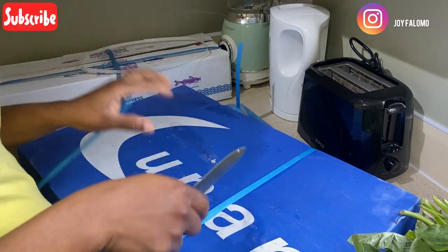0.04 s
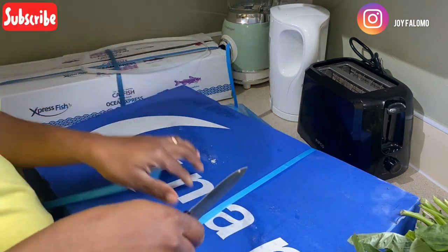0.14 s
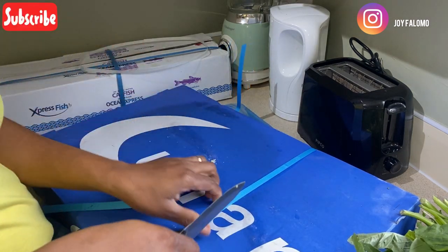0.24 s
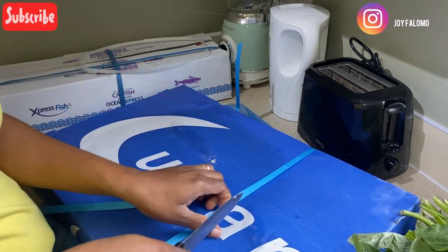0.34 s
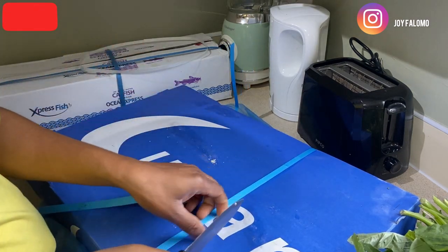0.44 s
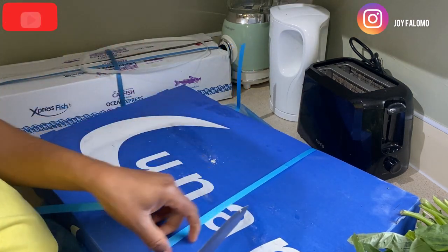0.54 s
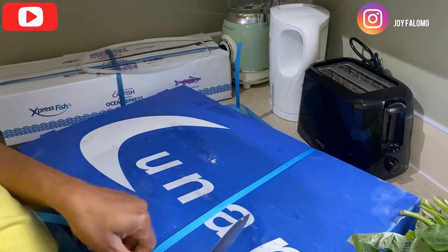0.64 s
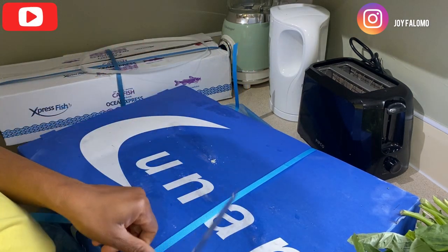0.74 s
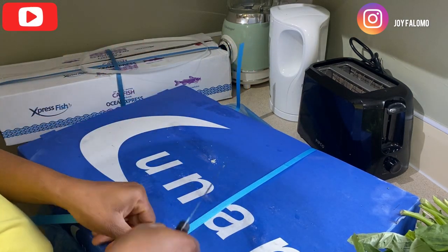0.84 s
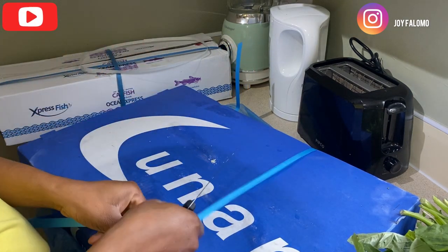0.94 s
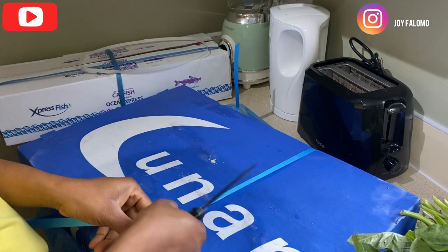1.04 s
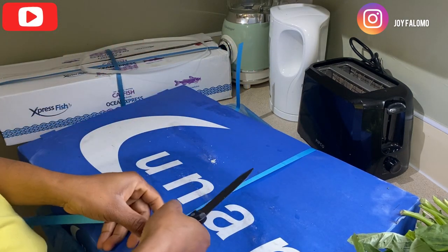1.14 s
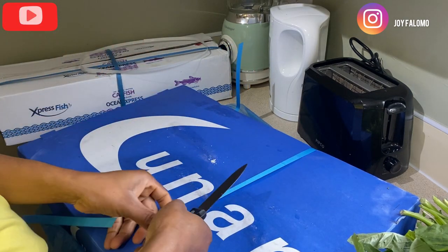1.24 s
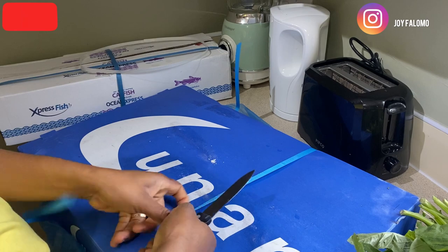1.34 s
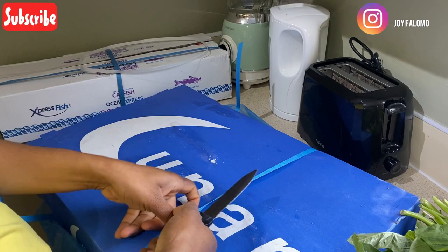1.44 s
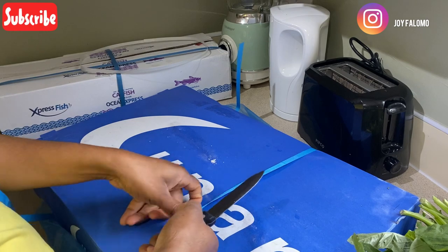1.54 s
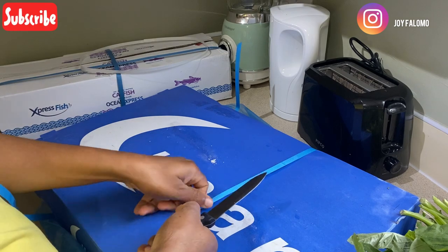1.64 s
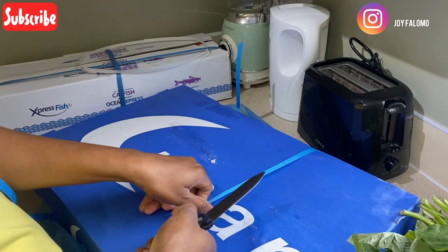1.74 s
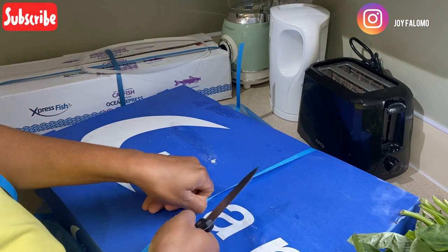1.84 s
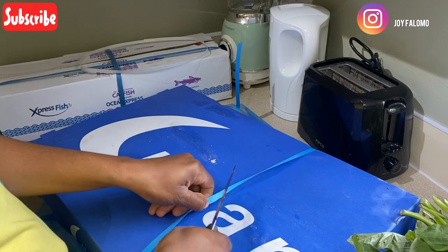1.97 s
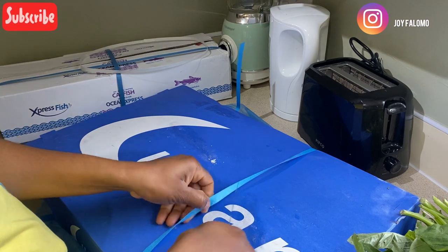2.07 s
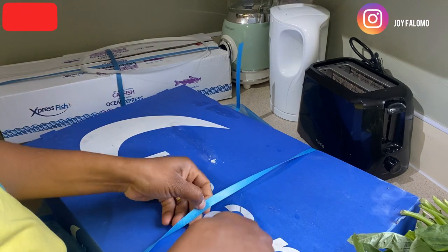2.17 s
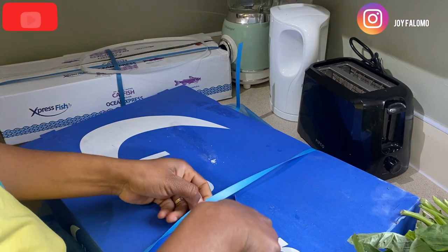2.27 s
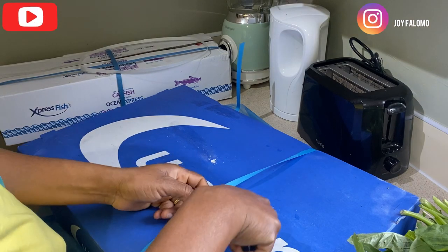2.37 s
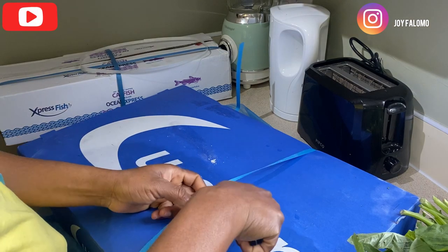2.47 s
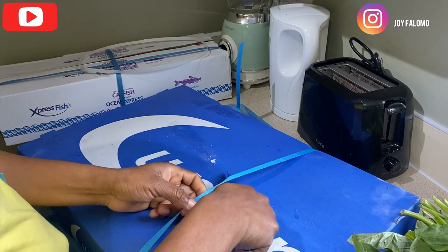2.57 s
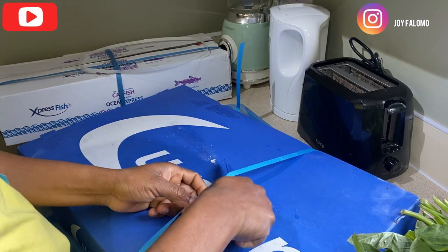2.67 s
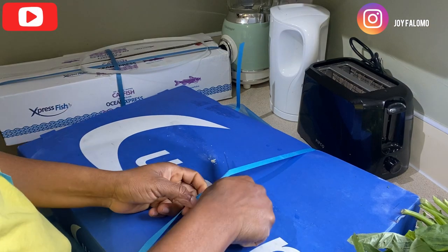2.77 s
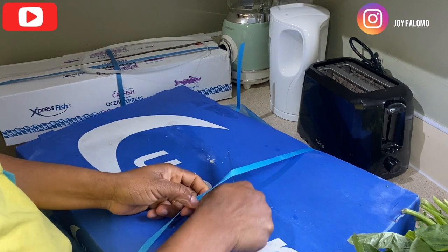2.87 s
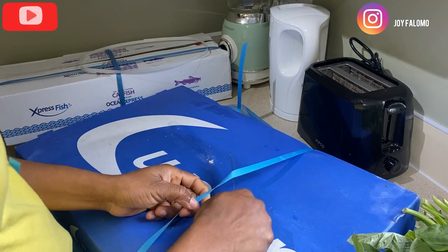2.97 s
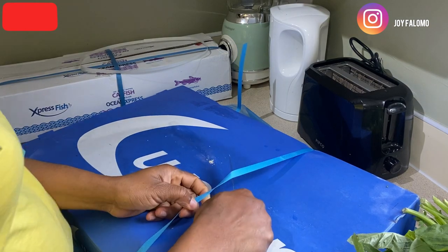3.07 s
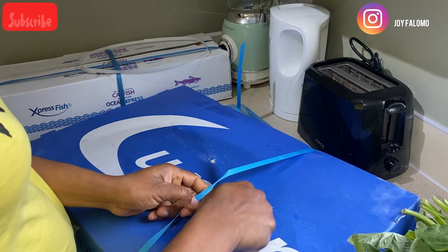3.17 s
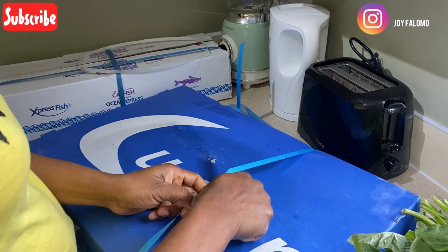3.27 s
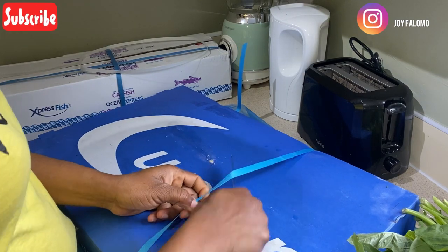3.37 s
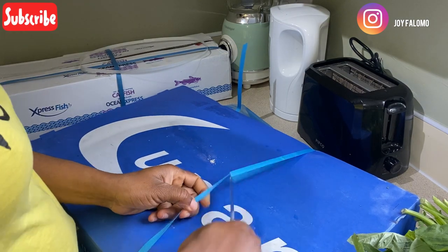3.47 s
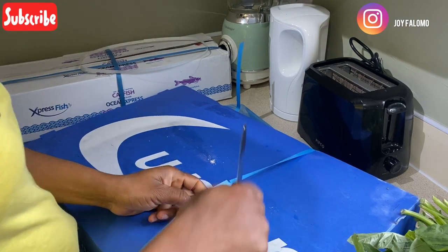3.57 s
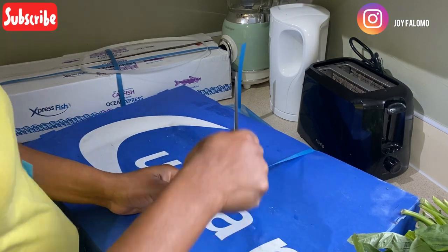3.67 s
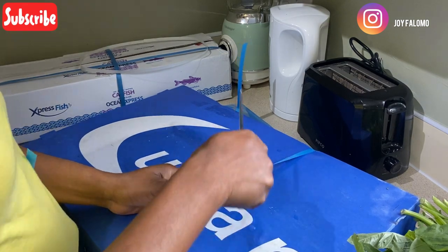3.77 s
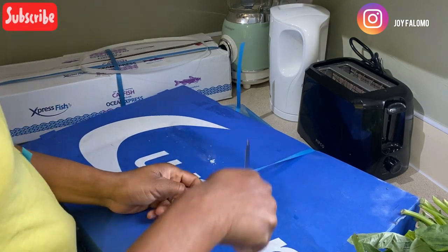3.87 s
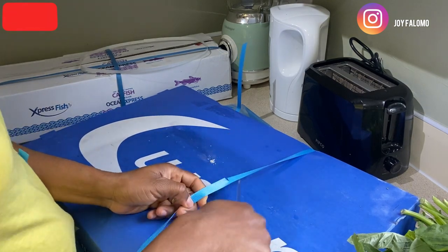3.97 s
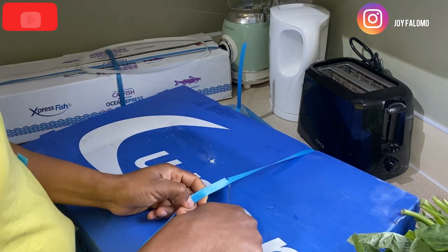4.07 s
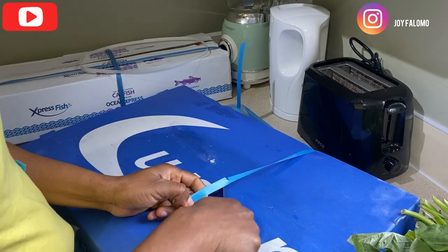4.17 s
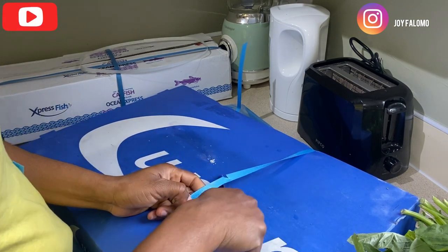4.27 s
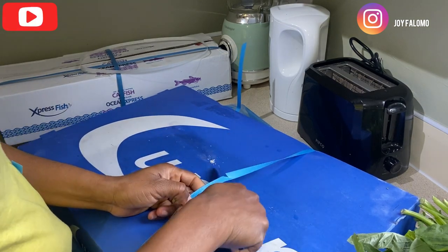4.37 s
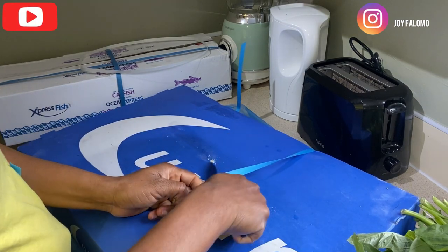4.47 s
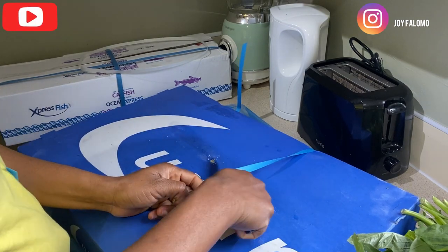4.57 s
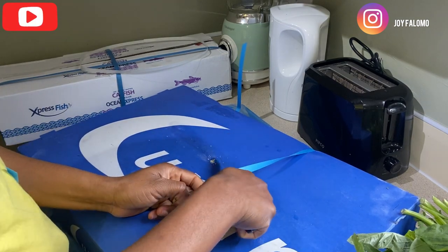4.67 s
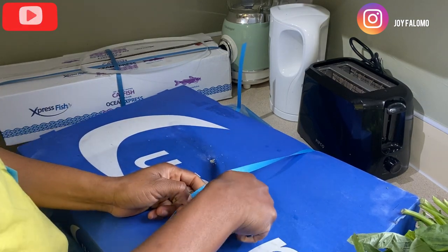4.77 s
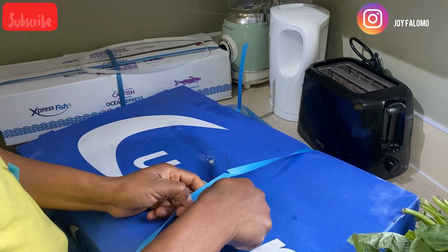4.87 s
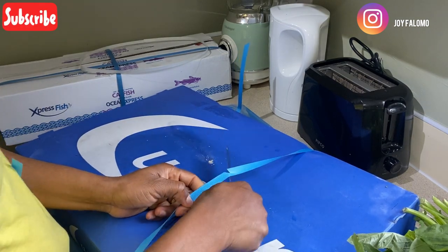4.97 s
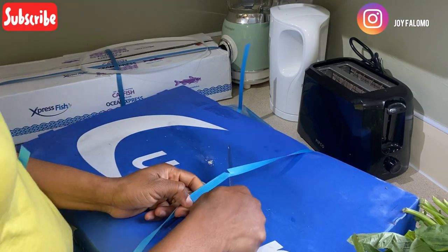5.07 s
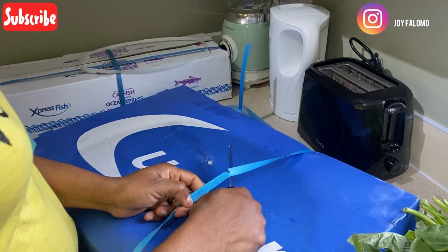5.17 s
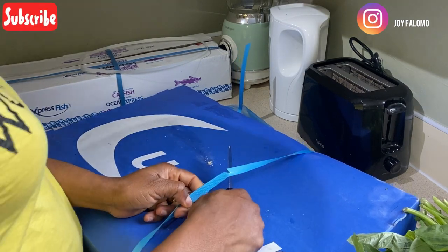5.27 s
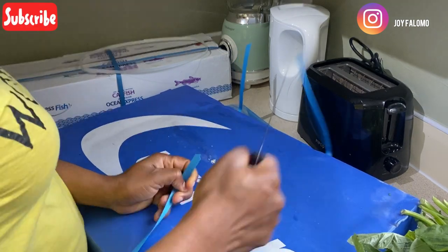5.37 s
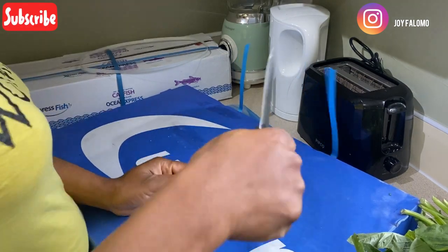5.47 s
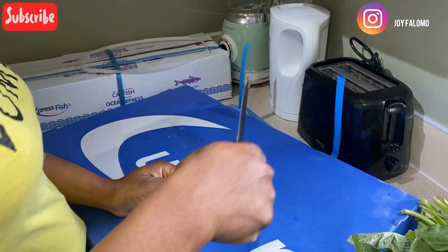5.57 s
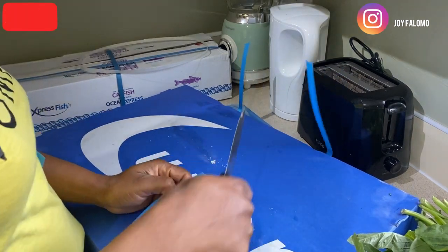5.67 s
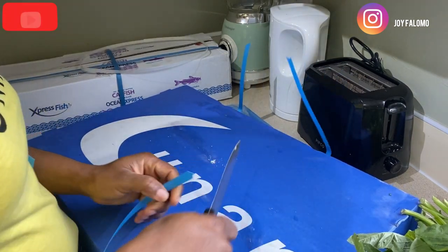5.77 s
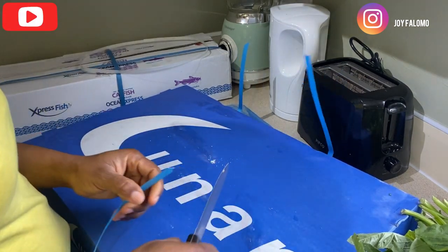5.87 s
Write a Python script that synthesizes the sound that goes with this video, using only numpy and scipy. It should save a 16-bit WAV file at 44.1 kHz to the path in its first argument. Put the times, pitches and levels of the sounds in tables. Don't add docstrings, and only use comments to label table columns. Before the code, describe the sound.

Close kitchen handling of a strapped cardboard box: soft knocks, scrapes and plastic crackles, with two sharp loud snaps as the tight band gives.

```python
import sys
import numpy as np
from scipy import signal
from scipy.fft import rfft, irfft, next_fast_len
from scipy.io import wavfile

SR = 44100
rng = np.random.default_rng(int(sys.argv[2]) if len(sys.argv) > 2 else 0)


def waveform_to_disk(signal):
    frames = np.transpose(np.atleast_2d(signal))
    scaled = np.clip(frames, -1, 1) * 32767
    samples = np.round(scaled).astype(np.int16)
    wavfile.write(sys.argv[1], SR, samples)


def gain_from_db(level_db):
    decades = np.asarray(level_db, float) / 20
    return 10 ** decades


N = 261228
SIZE = next_fast_len(N + SR // 3)
HZ = np.maximum(np.fft.rfftfreq(SIZE, 1 / SR), 1)

# mode_hz [Hz], level_db [dB], t60_s [s]
PANELS = [(72.6, -2.5, 0.1), (117.4, 4, 0.17), (180, -7, 0.11), (269, -6.5, 0.09), (303.7, -10, 0.11),
          (377, 1.5, 0.081), (440, -3.5, 0.11), (503.3, 0.5, 0.065), (555, 4, 0.02), (617, -4.5, 0.083),
          (695, -4.5, 0.059), (748, -12, 0.17), (875, -14.5, 0.095), (1000, -10, 0.044),
          (1107, -17.5, 0.18), (1287, -14.5, 0.16), (1427, -17.5, 0.042), (1750, -34, 0.01),
          (2040, -12, 0.021), (2520, -48, 0.018)]
DEEP_HZ = 220
# start_s [s], peak_db [dB], struck_hz [Hz], slap_db [dB], deep_db [dB]
LASHES = [
    (3.38, -15, 378, -10, -23),
    (3.413, -16, 480, -15, -23),
    (3.4765, -1.5, 400, -19, -23),
    (3.4832, -8, 390, -28, -36),
    (3.499, -28, 450, -29, -12),
    (5.3037, -1.5, 410, -5.5, -14),
    (5.328, -23, 606, -7, -22),
    (5.349, -19, 450, -17, -34),
    (3.469, -17, 546, -28, -18),
    (3.4796, -13, 640, -10, -26),
]
# start_s [s], peak_db [dB], struck_hz [Hz], slap_db [dB], deep_db [dB]
THUMPS = [(0.151, -24, 394, -13.5, -12.5), (0.258, -39.5, 484, -15, 7.5), (0.463, -38, 640, -5, -8),
          (0.56, -29, 436, -8, -11), (.8395, -29, 362, -7.5, -8), (.863, -43, 425, -13, 4),
          (1.032, -25.5, 326, -31, -8.5), (1.573, -35.5, 603, -3, -7), (1.967, -38.5, 420, -9, -14),
          (2.251, -23, 417, -4.5, -12.5), (2.604, -39, 422, -10, -4.5), (2.662, -32, 394, -22, -15),
          (2.759, -33, 275, -33, -7), (4.243, -43, 363, -18, -3), (4.33, -31, 285, -7, -20),
          (4.57, -27.5, 467, -8.5, -4), (5.277, -26, 373, -9, -15)]
# start_s [s], peak_db [dB], struck_hz [Hz], slap_db [dB]
TAPS = [(.252, -32, 605, -9), (.311, -30, 506, -19), (.367, -27, 493, -1.5), (.573, -28, 450, -14),
        (0.923, -24, 423, -14), (.939, -23.5, 504, -9), (.955, -18, 392, -10), (1.265, -39, 384, -7),
        (1.507, -38, 420, -6), (1.791, -32, 507, -6), (1.825, -28, 600, -9), (2.084, -33, 560, -9),
        (2.303, -31.5, 490, -7.5), (2.934, -41, 493, -10), (3.152, -29.5, 635, -3.5),
        (3.179, -29, 400, -24), (3.239, -33, 354, -14), (4.311, -32, 398, -5.5), (4.56, -21.5, 440, -14.5)]
# start_s [s], peak_db [dB], struck_hz [Hz]
MORE_TAPS = [(0.145, -24.5, 404), (0.285, -38, 390), (0.296, -33, 495), (0.342, -33, 511), (0.351, -31, 540),
             (0.851, -29.5, 549), (0.867, -40, 452), (0.968, -27.5, 477), (1.007, -36, 480), (1.224, -47, 358),
             (1.358, -38.5, 509), (1.388, -40.5, 390), (1.432, -44, 388), (1.481, -47, 517), (1.524, -43, 431),
             (1.583, -32, 390), (1.599, -50, 331), (1.661, -34.5, 400), (1.774, -34, 519), (1.91, -45, 423),
             (2.063, -44, 490), (2.208, -41, 377), (2.229, -38, 368), (2.264, -35, 433), (2.357, -36.5, 474),
             (2.439, -55, 297), (2.471, -43, 417), (2.497, -39.5, 428), (2.572, -53, 568), (2.591, -44, 415),
             (2.628, -33, 423), (2.732, -46, 340), (2.893, -37.5, 494), (2.985, -37, 480), (3.081, -50, 517),
             (3.162, -25, 304), (3.189, -41, 415), (4.207, -36, 377), (1.272, -37, 400), (3.401, -23, 500),
             (3.424, -23, 500), (3.453, -26, 480), (4.447, -39, 500), (4.477, -34, 430), (4.49, -37, 520),
             (1.985, -41, 450), (2.005, -41, 400), (2.1, -39, 615), (2.122, -44, 560), (2.142, -51, 500),
             (2.317, -35, 615), (2.33, -37.5, 420), (3.506, -19, 440), (3.518, -16.5, 290), (3.528, -24, 400),
             (3.542, -29, 350), (5.3115, -9.5, 560), (5.337, -21, 560), (5.362, -24, 300), (5.37, -25, 440)]
# freq_hz [Hz], level_db [dB per Hz]
FIRST_WAVE = [(150, -44), (400, 0), (900, 3), (2000, -5.5), (3500, -11), (6000, -36)]

# start_s [s], peak_db [dB], dull_db [dB]
TEARS = [(3.349, -27.5, -2), (3.3684, -18, -2.5), (3.3788, -16, -2.5), (3.394, -22, -2), (3.4128, -20, 6),
         (3.4416, -37, -20), (3.462, -23, -20), (3.4661, -13, -24), (3.4769, -15, -22),
         (3.4805, -13.5, -20), (3.487, -17, -13), (5.187, -46, -32), (5.201, -37, -21),
         (5.2208, -33.5, -14), (5.2744, -26.5, -4), (5.298, -13.5, -31), (5.303, -7.5, -1.5)]
# start_s [s], peak_db [dB], dull_db [dB]
TICKS = [(.016, -50, -10), (0.125, -57, -16), (.1515, -48.5, -11), (.257, -54, -13), (0.3618, -35, -15),
         (0.5618, -37, 1.5), (.5834, -34, -8), (0.942, -35, -25), (0.954, -40, -28), (1.5722, -43.5, 4.5),
         (2.2505, -57, -4), (2.2862, -47, 11.5), (2.808, -63, -40.5), (2.9764, -53, 9), (3.042, -50, -10),
         (3.131, -41, 2), (3.1513, -36.5, -3.5), (4.129, -48, 13), (4.563, -35.5, 0.5), (4.753, -53, -3),
         (5.0072, -47.5, 3), (5.038, -46, 4), (5.573, -47, 3), (5.8173, -40, -29)]
# start_s [s], peak_db [dB]
PRICKS = [(1.3044, -38), (1.3894, -40), (2.3744, -56), (2.5272, -50), (2.5444, -42), (2.5544, -51),
          (2.6874, -36), (2.7174, -51), (2.7364, -41), (2.7774, -54), (2.7874, -40), (2.9387, -32),
          (2.9602, -35), (2.9764, -40), (3.0254, -48), (3.0435, -47), (4.4196, -42), (4.4944, -37),
          (5.008, -31), (5.0386, -32), (5.0594, -39), (5.1281, -33), (5.1544, -44), (5.1632, -45.5),
          (5.2022, -37)]
# freq_hz [Hz], level_db [dB per Hz]
CRACK = [(5000, -9.5), (6000, -12), (7000, -3.5), (8300, -9), (9200, 0), (11000, 0.5), (12500, -1),
         (14500, -16), (16000, -15)]
# time_s [s], slip_rate_hz [slips per s], level_db [dB]
CREAK = [
    (4.05, 293, -69),
    (4.06, 290, -46),
    (4.088, 287, -42),
    (4.106, 270, -52),
    (4.13, 263, -43.5),
    (4.145, 278, -54),
    (4.165, 275, -45),
    (4.18, 280, -63),
]
# mode_hz [Hz], width_hz [Hz], level_db [dB]
STRAP_MODES = [(293, 55, -19), (580, 74, -5), (890, 74, -10), (1180, 120, -13), (1460, 180, -7),
               (1790, 120, -12), (2860, 120, -21), (3620, 220, -8), (4280, 270, -9.5)]

# start_s [s], length_s [s], panel_db [dB], scrape_db [dB re panel]
DRAGS = [(0.0, 0.015, -53, -23), (0.169, 0.015, -51, 1), (0.26, 0.12, -43, -13), (0.478, 0.15, -47, -10.5),
         (0.86, 0.074, -43, -8.5), (1.057, 0.057, -44, -32), (1.23, 0.21, -49.5, -14),
         (1.579, 0.31, -49, -10), (1.89, 0.89, -53.5, -10), (2.235, 0.039, -45, -31), (2.33, 0.46, -66, -3),
         (2.494, 0.17, -47.5, -19), (2.825, 0.13, -49.5, -5.5), (3.13, 0.1, -44, -14),
         (3.312, 0.1, -42.5, -7), (3.371, 0.11, -33, -13), (4.11, 0.07, -46, -13),
         (4.196, 0.052, -46.5, -24), (4.315, 0.17, -44.5, -13), (4.57, 0.0085, -45, -15),
         (4.743, 0.29, -51.5, -7), (5.11, 0.26, -54.5, -12), (5.365, 0.11, -39, -8),
         (5.857, 0.083, -56, -13)]
# start_s [s], length_s [s], level_db [dB]
SLIDES = [(0.0, 0.071, -70.5), (0.165, 0.038, -56.5), (0.256, 0.12, -51), (0.475, 0.24, -57.5),
          (0.843, 0.27, -61), (0.931, 0.012, -48), (1.227, 0.21, -59), (1.591, 0.013, -51.5),
          (1.668, 0.011, -48), (1.802, 0.36, -59.5), (2.474, 0.25, -57.5), (2.833, 0.12, -49.5),
          (3.115, 0.02, -50.5), (3.16, 0.036, -48.5), (3.321, 0.11, -48), (3.38, 0.02, -37),
          (3.415, .014, -37.5), (3.45, 0.047, -40.5), (3.596, 0.11, -55.5), (3.788, 0.19, -51),
          (4.052, 0.18, -54), (4.306, 0.13, -49.5), (4.851, 0.22, -51.5), (5.102, .19, -54),
          (5.304, 0.02, -33), (5.46, 0.15, -53), (5.704, 0.036, -50), (5.804, 0.086, -53)]
# start_s [s], length_s [s], rumble_db [dB]
LEANS = [
    (0.235, 0.038, -48.5),
    (.6, 0.72, -56.5),
    (2.6, 0.99, -55.5),
    (3.704, 0.1, -57),
    (4.256, 0.1002, -49),
    (4.648, 0.53, -56.5),
    (5.396, 0.16, -53),
]
# rise [dB per s], sag while held [dB per s, negative swells], fade [dB per s],
# rest level [dB]
DRAG_SHAPE, SLIDE_SHAPE, LEAN_SHAPE = (606, -1, 105, -69.5), (494, -6.5, 142, -63), (100, 2, 89, -59.5)
# freq_hz [Hz], level_db [dB per Hz]
SCRAPE = [(470, -8.5), (800, -4), (1260, -4), (1360, -8), (1470, -4.5), (1540, -5), (2040, -8.5),
          (2580, -14.5), (4200, -20.5), (5460, -23.5), (9240, -120)]
RUSTLE = [(2600, 10), (3500, 7.5), (5200, 7), (7000, 7.5), (8200, 6), (9200, 8.5), (10500, 5), (11500, 5.5),
          (12600, 2), (14300, -2), (15800, -38)]
RUMBLE = [(12, -30), (20, 6), (63, 7), (102, -7), (135, 5.5), (167, -21.5), (200, -38), (260, -48),
          (440, -120)]

# start_s [s], length_s [s], centre_hz [Hz], level_db [dB]
BRUSHES = [(0.278, 0.099, 1480, -42.5), (.286, 0.0097, 1860, -46.5), (.34, 0.021, 1770, -46),
           (0.364, .008, 3500, -49), (1.575, 0.012, 2100, -44.5), (1.672, .02, 2220, -50),
           (1.75, 0.015, 2000, -45), (1.765, 0.024, 2110, -41.5), (1.76, 0.032, 3400, -50.5),
           (1.764, 0.029, 4700, -48), (1.774, 0.017, 5700, -50), (2.63, 0.03, 6200, -54),
           (2.665, .03, 6600, -55), (3.7, 0.017, 4000, -56), (2.085, 0.051, 640, -52),
           (2.029, 0.087, 7240, -54), (2.811, 0.0073, 10800, -38.5), (3.152, .007, 1450, -39),
           (3.479, .008, 2000, -24), (4.232, 0.055, 3700, -51), (4.41, 0.09, 1800, -52.5),
           (4.15, .03, 1250, -49), (3.863, 0.062, 5040, -55), (5.615, .008, 1330, -43),
           (1.766, 0.021, 1200, -49.5), (1.579, 0.016, 1550, -51), (5.61, 0.072, 1220, -45.5),
           (5.669, 0.035, 8500, -51), (5.814, 0.053, 9100, -41)]
# start_s [s], length_s [s], pitch_hz [Hz], level_db [dB]
SQUEAKS = [(0.571, 0.025, 700, -28), (.572, .022, 440, -37), (.652, .036, 120, -41), (0.6, 0.026, 620, -43),
           (0.69, 0.024, 705, -44.5), (2.93, 0.06, 900, -51), (2.93, 0.055, 420, -46.5),
           (2.525, 0.02, 1270, -52), (4.1, .035, 540, -43), (4.148, 0.031, 1120, -41),
           (4.12, 0.016, 2850, -48.5)]

# freq_hz [Hz], t60_s [s]
ROOM_T60 = [(60, 0.99), (400, 0.2), (1500, 0.28), (5000, 0.32), (15000, 0.16)]
# freq_hz [Hz], level_db [dB]
ROOM_COLOUR = [(100, -10), (250, -4.5), (400, 1), (700, 0.5), (2000, 0), (8000, -2)]
# freq_hz [Hz], left_lead [rad]; odd multiples of pi cancel when the ports are summed
PORT_LEAD = [(0, 0), (3100, .7), (5430, -.1), (7150, 0), (8200, -1.6), (8700, -3.1), (9400, -3.18),
             (9800, -4.4), (10900, -6.2), (11600, -6.7), (12500, -8), (12950, -9.39), (13700, -9.46),
             (14100, -10.7), (14600, -12.4), (16400, -12.8)]
# freq_hz [Hz], likeness [0-1]
LIKENESS = [(40, 1), (130, 0.94), (290, 0.91), (640, 0.66), (1400, 0.51), (3100, 0.82), (6000, 0.68),
            (8500, .999), (16000, .999)]
# freq_hz [Hz], tilt_db [dB]
PORT_TILT = [(60, -2.5), (300, 1.4), (700, 0.5), (1300, 0.2), (2400, 2), (4400, 4.5),
             (8000, 0), (16000, 0)]


def rms_one(x):
    return x / np.sqrt(np.mean(x ** 2) + 1e-20)


def in_time(rows):
    s, *columns = np.transpose(rows)
    return [np.interp(np.arange(N) / SR, s, column) for column in columns]


def at_hz(points, hz=HZ):
    p = np.array(points)
    return np.interp(np.log(hz), np.log(np.maximum(p[:, 0], 1)), p[:, 1])


def filtered(x, response):
    return irfft(rfft(x, SIZE) * response, SIZE)[..., :N]


def coloured(x, spectrum):
    return rms_one(filtered(x, gain_from_db(at_hz(spectrum))))


def drift(rate):
    knots = rng.standard_normal(2000)
    return np.interp(np.arange(N) / SR * rate, np.arange(2000), knots)


def grit(per_s, spread_db):
    sizes = gain_from_db(spread_db * np.minimum(rng.exponential(1, (2, N)), 5))
    sizes = sizes * rng.choice([-1, 1], (2, N))
    return sizes * (rng.random((2, N)) < per_s / SR)


def ring(x, hz, t60):
    r, w = gain_from_db(-60 / (t60 * SR)), 2 * np.pi * hz / SR
    return signal.lfilter([0, np.sin(w)], [1, -2 * r * np.cos(w), r * r], x + 1e-18)


def burst(times, levels_db, t60s, rise_s):
    out, t = np.zeros(N), np.arange(SR // 4) / SR
    for s, level_db, t60 in zip(times, levels_db, t60s):
        i = round(s * SR)
        shape = (1 - np.exp(-t / rise_s)) * gain_from_db(level_db - 60 * t / max(t60, .003))
        out[i:i + len(t)] += shape[:N - i]
    return out


def strokes(rows, levels_db, shape):
    rise_db, sag_db, fade_db, rest_db = shape
    t, power = np.arange(0, N + 64, 64) / SR, gain_from_db(2 * rest_db)
    for (s, length, *_), level_db in zip(rows, levels_db):
        late = t - s
        rise = rise_db * np.minimum(late, 0)
        sag = sag_db * np.clip(late, 0, length)
        fade = fade_db * np.maximum(late - length, 0)
        power = power + gain_from_db(2 * (level_db + rise - sag - fade))
    return np.interp(np.arange(N) / SR, t, 10 * np.log10(power))


def blows():
    rows = [(*row, 6) for row in LASHES] + [(*row, 10) for row in THUMPS]
    rows += [(*row, -26.5, 15) for row in TAPS]
    rows += [(*row, -14, -26.5, 15) for row in MORE_TAPS]
    return np.transpose(rows)


def first_wave(s, levels_db):
    clicks = np.zeros(N)
    clicks[np.round(s * SR).astype(int)] = gain_from_db(levels_db)
    late_cycles = 1.15
    response = gain_from_db(at_hz(FIRST_WAVE)) * np.exp(-2j * np.pi * late_cycles * np.log(HZ))
    return filtered(clicks, response) / np.abs(irfft(response, SIZE)).max()


def knocks():
    s, peak_db, struck_hz, slap_db, deep_db, falloff_db = blows()
    chance = rng.standard_normal((len(s), 2 * len(PANELS)))
    is_lash = (np.arange(len(s)) < len(LASHES)).astype(int)
    out = np.zeros(N)
    for k, (hz, level_db, t60) in enumerate(PANELS):
        near_db = -falloff_db * np.minimum(np.abs(np.log2(hz / struck_hz)), 1.2)
        place_db = deep_db + 2.0 if hz < DEEP_HZ else near_db
        late_s = min(1.041 / hz, .0055) * (1 + 0.32 * np.tanh(chance[:, 2 * k]))
        at = np.round((s + late_s) * SR).astype(int)
        push_db = peak_db + level_db + place_db + 1.7 * chance[:, 2 * k + 1] - 7.0
        push = np.zeros((2, N))
        push[is_lash, at] = (-1) ** k * gain_from_db(push_db)
        swell = np.exp(-2 * np.pi * 5.5 * hz / SR)
        touch, lash = signal.lfilter([1 - swell], [1, -swell], push + 1e-18)
        damping = 1 if hz < DEEP_HZ else 0.46
        out += ring(touch, hz, t60) + ring(lash, hz, t60 * damping)
    slap = burst(s, peak_db + slap_db - 3.5, np.full(len(s), .03), rise_s=0.0012)
    slap = slap * coloured(grit(12000, 2.2)[0], SCRAPE)
    return out + slap + first_wave(s, peak_db + slap_db - 1.5)


def ticks():
    pricks = [(s, db - 4, -4.5) for s, db in PRICKS]
    s, peak_db, dull_db = np.transpose(TICKS + TEARS + pricks)
    t60 = np.repeat([0.07, .0075, 0.0064], [len(TICKS), len(TEARS), len(PRICKS)])
    t60 = t60 * gain_from_db(0.19 * (peak_db + 34.0))
    bright = coloured(rng.standard_normal(N), CRACK)
    dull = coloured(rng.standard_normal(N), [(2000, 4), (2600, 3.5), (5800, -2), (6800, -16)])
    bright = bright * burst(s, peak_db - 1.5, t60, rise_s=0.00019)
    return bright + dull * burst(s, peak_db + dull_db - 11, 2.45 * t60, rise_s=0.00019)


def creak():
    per_s, level_db = in_time(CREAK)
    cycles = np.cumsum(per_s * (1 + .02 * drift(250.)) / SR)
    slips = np.diff(np.floor(cycles), prepend=0) * gain_from_db(2.5 * drift(300.))
    rung = sum(gain_from_db(db) * ring(slips, hz, 2.4 / width) for hz, width, db in STRAP_MODES)
    return gain_from_db(level_db) * rms_one(rung)


def rubbing():
    panel_db = strokes(DRAGS, [db for _, _, db, _ in DRAGS], DRAG_SHAPE)
    scrape_db = strokes(DRAGS, [db + more_db for _, _, db, more_db in DRAGS], DRAG_SHAPE)
    rustle_db = strokes(SLIDES, [db for *_, db in SLIDES], SLIDE_SHAPE)
    rumble_db = strokes(LEANS, [db for *_, db in LEANS], LEAN_SHAPE)
    flutter_db = drift(25.)

    drag = grit(1500, 1.7) * gain_from_db(panel_db + 2.0 * flutter_db)
    unit = np.sqrt(np.mean((drag / gain_from_db(panel_db)) ** 2))
    boom = np.zeros((2, N))
    for hz, db, t60 in PANELS:
        if hz > DEEP_HZ:
            boom += gain_from_db(db - 0.46 * np.log2(hz / 400)) * ring(drag, hz, 0.81 * t60) / unit

    scrape = coloured(grit(9000, 3.0), SCRAPE) * gain_from_db(scrape_db + 1.0 * flutter_db + 1.4 * drift(45.))
    rustle = coloured(grit(20000, 2.05), RUSTLE) * gain_from_db(rustle_db + 1.3 * flutter_db + 2.2 * drift(67.0))
    sheen = signal.sosfilt(signal.butter(4, 8800, "high", fs=SR, output="sos"), rustle)
    rustle = rustle + sheen * (gain_from_db(2.3 * drift(7.4)) - 1)
    rumble = coloured(rng.standard_normal((2, N)), RUMBLE) * gain_from_db(rumble_db + 3.0 * drift(15.))
    return gain_from_db(-32.5) * boom + scrape + rustle + rumble


def brush_width(length, hz):
    return min(3200, 17500000.0 / hz) if hz > 4500 else 5.7 * length * hz


def scuffs():
    out, slips = np.zeros((2, N)), grit(12000, 2.7)
    for s, length, hz, level_db in BRUSHES:
        i, t = round(s * SR), np.linspace(0, 2, round(2 * length * SR))
        rung = ring(slips[:, i:i + len(t)], hz, 1.95 / brush_width(length, hz))
        swell = (np.minimum(t / .07, 1) / (1 + t ** 5))[:rung.shape[1]]
        out[:, i:i + len(t)] += gain_from_db(level_db) * swell * rms_one(rung)
    return signal.sosfilt(signal.butter(4, 12000, fs=SR, output="sos"), out)


def squeaks():
    out, wobble = np.zeros(N), 1 + .018 * drift(220.)
    flutter_db = 2.5 * drift(160.)
    for s, length, hz, level_db in SQUEAKS:
        i, t = round(s * SR), np.linspace(0, 1, round(length * SR))
        here = slice(i, i + len(t))
        phase = 2 * np.pi * hz * np.cumsum(wobble[here]) / SR
        tone = np.sin(phase) + gain_from_db(-15) * np.sin(2 * phase)
        out[here] += gain_from_db(level_db + flutter_db[here]) * np.sin(np.pi * t ** .7) * tone
    return out


def kitchen(x):
    per_s = -np.log(1000) / at_hz(ROOM_T60) - 2j * np.pi * HZ
    paths = np.zeros((2, len(HZ)), complex)
    lags_s = np.geomspace(.011, .058, 20) * rng.uniform(.97, 1.03, 20)
    for k, lag in enumerate(lags_s):
        loop = np.exp(per_s * lag)
        paths[k % 2] += loop / (1 - loop) * (-1) ** (k // 2)
    return filtered(x, paths * gain_from_db(at_hz(ROOM_COLOUR))) / np.sqrt(10)


def hush():
    spectrum = [(40, -13), (400, -2), (3000, -51.0), (12000, -33), (16000, -17)]   # (Hz, dB per Hz)
    return gain_from_db(-66.5) * coloured(rng.standard_normal((2, N)), spectrum)


def ports(near, wide):
    sides = np.array([[1], [-1]])
    alike = np.clip(at_hz(LIKENESS), 0, 1)
    common = near + filtered(wide[0], np.sqrt(alike))
    own = filtered(wide[1], np.sqrt(1 - alike)) * sides
    lead = np.exp(.5j * np.interp(HZ, *np.transpose(PORT_LEAD)) * sides)
    tilt = gain_from_db(.5 * at_hz(PORT_TILT) * sides)
    return filtered(common + own, lead * tilt)


def scene():
    crack, body = ticks(), knocks() + creak()
    scuff, squeak = scuffs(), squeaks()
    side_wall = gain_from_db(-4.5) * np.roll(body + crack, round(0.0017 * SR)) * [[0], [1]]
    room = gain_from_db(-4.5) * kitchen(body + crack + scuff[0] + .4 * squeak)
    wide = rubbing() + scuff + room + hush() + side_wall
    return ports(body + crack + squeak, wide) + gain_from_db(-10.0) * crack


def band_limit(x):
    return signal.sosfilt(signal.butter(12, 16800, fs=SR, output="sos"), x)


def record(dry):
    heard = signal.sosfilt(signal.butter(2, 52, "high", fs=SR, output="sos"), dry)
    rounded = np.tanh(heard / .95) * .95
    top_cut = signal.cheby2(10, 60, 16600, fs=SR, output="sos")
    return band_limit(signal.sosfilt(top_cut, rounded))


dry = scene()
out = record(dry)
waveform_to_disk(out)
```